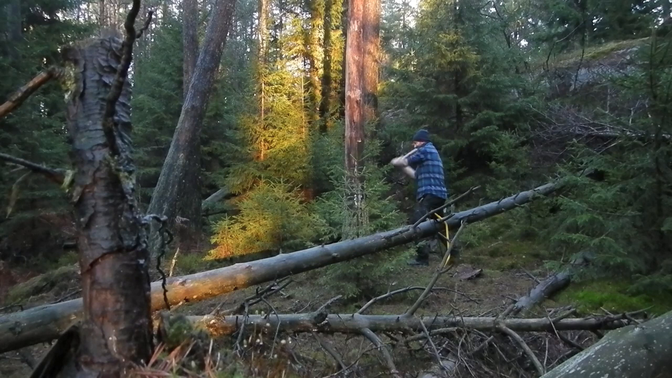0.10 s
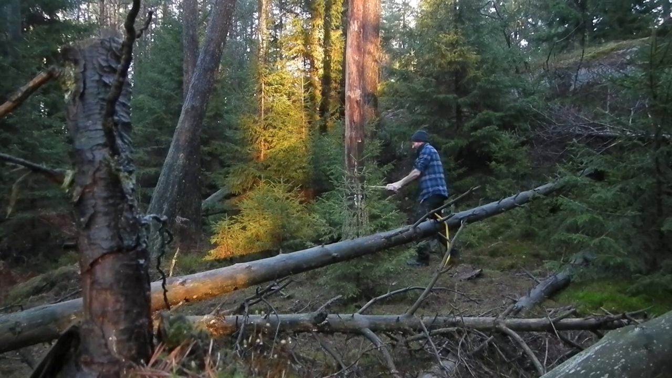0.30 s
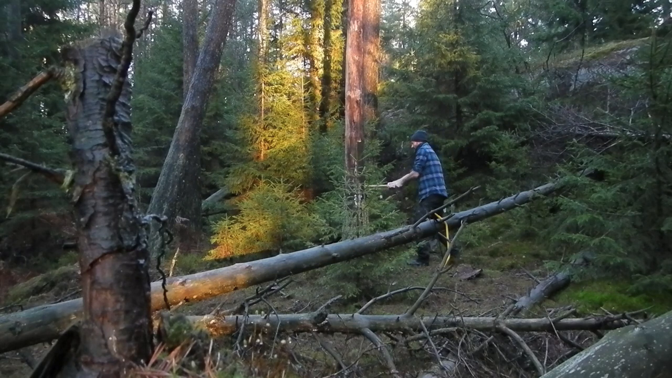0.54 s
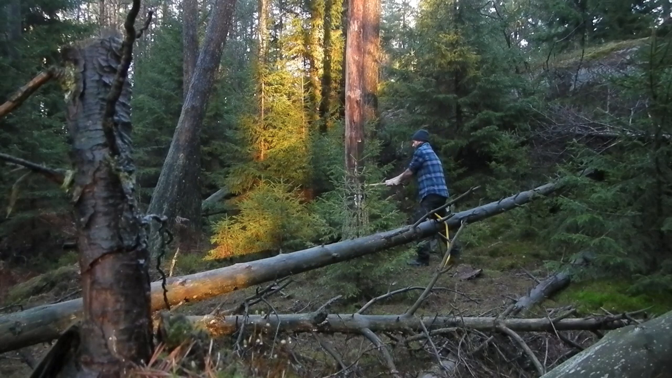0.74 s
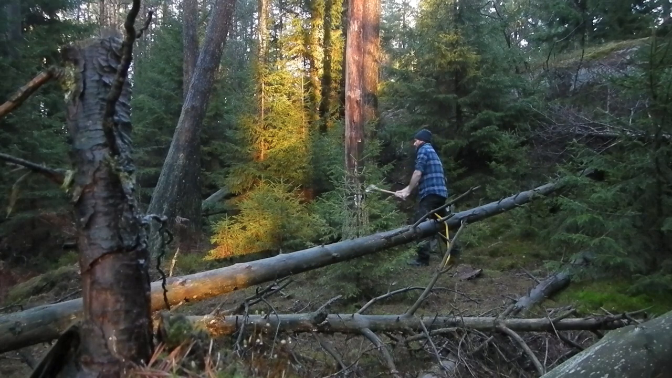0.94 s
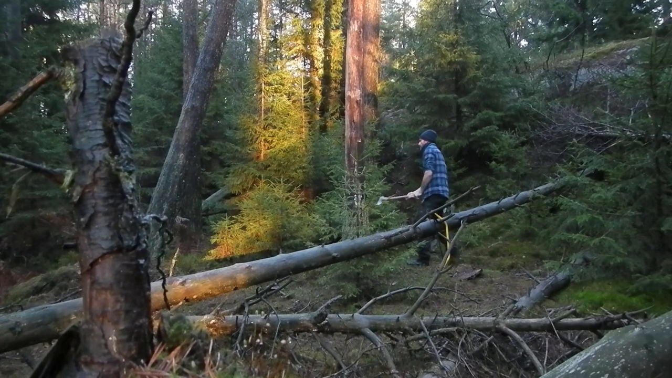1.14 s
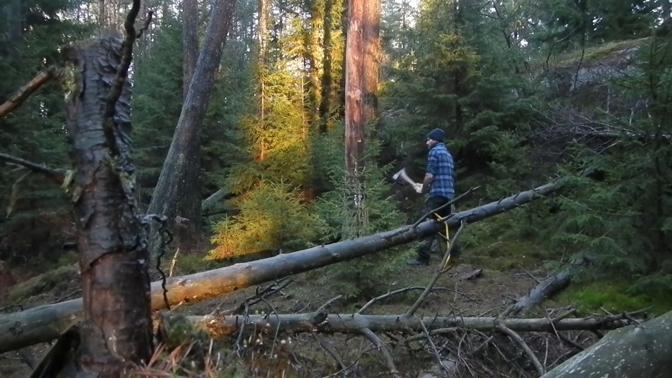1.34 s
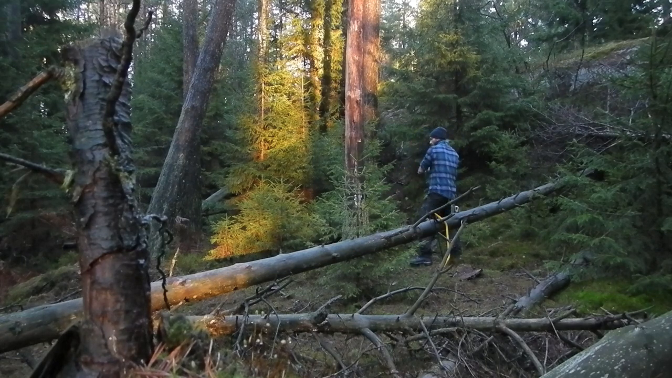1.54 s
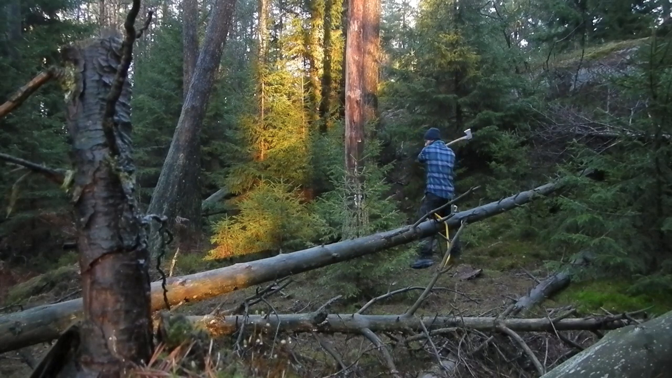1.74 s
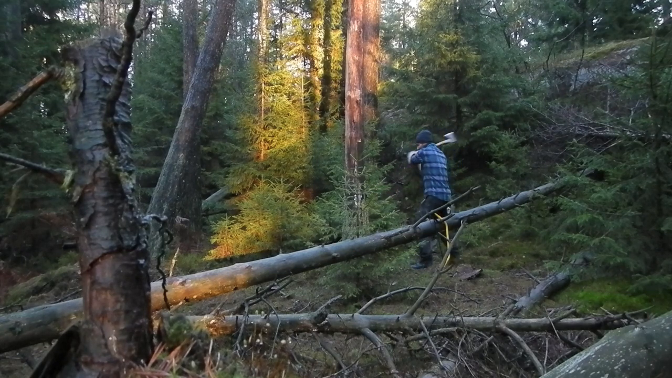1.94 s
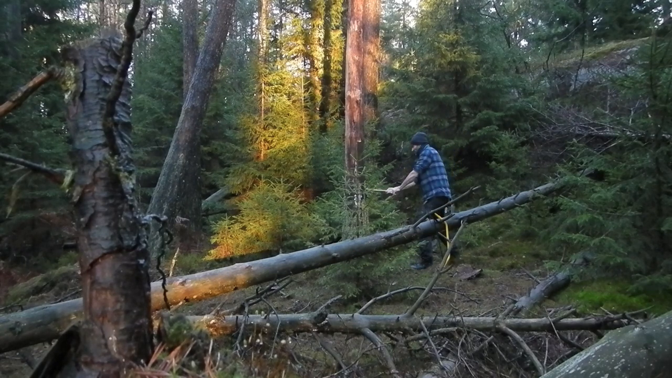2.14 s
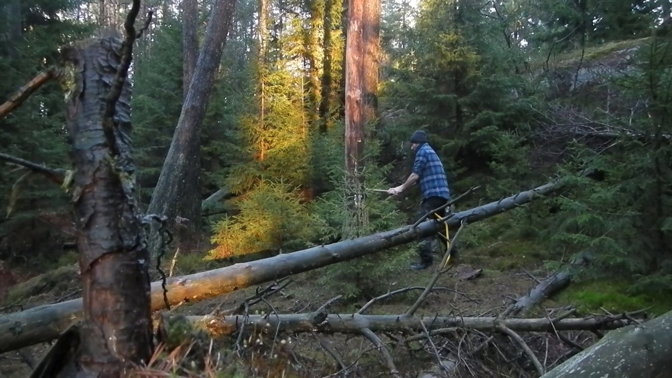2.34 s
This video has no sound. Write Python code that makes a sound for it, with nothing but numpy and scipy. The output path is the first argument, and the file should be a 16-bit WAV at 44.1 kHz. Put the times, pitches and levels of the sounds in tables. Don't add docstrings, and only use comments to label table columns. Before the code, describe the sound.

Two hard axe chops into dry wood, nearly two seconds apart, with short woodland echoes and steady hiss

```python
import sys
import numpy as np
from scipy import signal
from scipy.fft import rfft, irfft, next_fast_len
from scipy.io import wavfile
from scipy.ndimage import map_coordinates

SR = 44100
rng = np.random.default_rng(int(sys.argv[2]) if len(sys.argv) > 2 else 0)


def boost(x):
    u = np.asarray(x, float) / 20
    return 10 ** u


def generate_wav(signal):
    frames = np.transpose(np.atleast_2d(signal))
    scaled = np.clip(frames, -1, 1) * 32767
    pcm = np.round(scaled).astype(np.int16)
    wavfile.write(sys.argv[1], SR, pcm)


N = 110250


def unit(x):
    return x / np.sqrt(np.mean(x ** 2) + 1e-20)


def along(points, hz):
    point_hz, value = np.transpose(points)
    return np.interp(np.log(hz + 1), np.log(point_hz + 1), value)


def coloured(x, points):
    size = next_fast_len(x.shape[-1] + 8192)
    gain = boost(along(points, np.fft.rfftfreq(size, 1 / SR)))
    return irfft(rfft(x, size) * gain, size)[..., :x.shape[-1]]


def wobble(rate):
    knots = rng.standard_normal(int(N * rate / SR) + 4)
    return map_coordinates(knots, [np.arange(N) * rate / SR])


def add(track, x, start_s):
    part = track[..., max(round(start_s * SR), 0):][..., :x.shape[-1]]
    part += x[..., :part.shape[-1]]


def pan(db):
    return boost([[db], [-db]])


def stereo(mid, side):
    return np.array([mid + side, mid - side])


def burst(points, t60):
    t = np.arange(SR // 10) / SR
    noise = unit(coloured(rng.standard_normal(len(t)), points))
    rise = np.sin(np.pi / 2 * np.clip(t / 0.00037, 0, 1)) ** 2
    return noise * boost(-60 * t / t60) * rise


def puff(points, db, t60, side_db):
    t = np.arange(SR // 2) / SR
    noise = unit(coloured(rng.standard_normal((2, len(t))), points))
    level_db = np.array([[db], [db + side_db]])
    fade_db = 60 * (t / t60) ** 1.42
    mid, side = noise * boost(level_db - fade_db) * (1 - np.exp(-t / 0.0043))
    return stereo(mid, side)


# delay in seconds, level in dB.
FIBRE_SPLITS = [
    [(.0008, -20), (.0018, 1), (.0030, -1), (.0040, 0.5), (.0052, -24.5)],
    [(.0006, 4), (.0016, 4.5), (.0028, -4), (.0038, 5.5), (.0050, 5)],
]
# frequency in Hz, level in dB.
CRACK_COLOUR = [(300, -42), (800, -10), (3000, 4), (6000, -16), (10000, -10), (14500, -20), (15800, -60)]
# frequency in Hz, level in dB, 60 dB decay in seconds,
# start delay in seconds.
FIRST_CUT_TONES = [(160, -30.5, 0.026, 0.0012), (580, -6.5, 0.032, 0.00211), (810, -7, 0.0087, 0.00321),
                   (969, -2.5, 0.099, 0.002113), (1197, -4, 0.019, 0.00375), (1570, -7.5, 0.023, 0.00358),
                   (1870, -3, 0.021, 0.00131), (2620, -5, 0.02, 0.00102), (3103, -4.5, 0.024, 0.000942),
                   (3536, -8, 0.013, 0.000994), (5730, -14.5, 0.0055, 0.000945)]
SECOND_CUT_TONES = [(163, -26, 0.037, 0.002), (610, -10.5, 0.029, 0.00273), (805, -28, 0.02, 0.0029),
                    (948, -10, 0.081, 0.003), (1220, -8.5, 0.028, 0.00123), (1487, -6.5, 0.027, 0.002075),
                    (1943, -10, 0.021, 0.002), (2210, -11, 0.014, 0.00113), (2587, -3.5, 0.015, 0.00101),
                    (2946, -13, 0.011, 0.00104), (3050, -10, 0.013, 0.0012),
                    (3666, -15.5, 0.0081, 0.000974), (4120, -13.5, 0.01, 0.000904),
                    (5110, -12, 0.0098, .0006)]
# frequency in Hz, level in dB.
CUT_DIPS = [
    [(1100, 0.5), (1250, -6), (1400, 1.5), (2050, -1.5), (2300, 2), (2500, -0.5)],
    [(1500, -0.5), (1700, -14), (1850, -1.5), (2050, 0), (2250, 0)],
]
# frequency in Hz, level in dB.
GROUND_BOUNCE = [(30, -26), (80, -4), (150, 12), (270, -13), (560, 2), (720, -2), (850, -0.5)]


def chop(k):
    tones = (FIRST_CUT_TONES, SECOND_CUT_TONES)[k]
    lodge_s = (0.0062, 0.0058)[k]
    rock_s, ring_lodge_db = (0.012, 0.0155)[k], (2, 6)[k]
    wood, ring = np.zeros(SR // 5), np.zeros(SR // 5)
    t = np.arange(SR // 10) / SR
    for i, (hz, level_db, t60, delay_s) in enumerate(tones):
        swell = 1 - np.exp(-t * hz / 0.9)
        tone = boost(level_db - 4 - 60 * t / t60) * np.sin(2 * np.pi * hz * t) * swell
        add(ring if i == 3 else wood, tone, delay_s)
    for delay_s, db in FIBRE_SPLITS[k]:
        dulling = [(4530, 0), (7400, -1000 * delay_s)]
        crack = coloured(burst(CRACK_COLOUR, 0.0044), dulling)
        add(wood, boost(db - 14) * crack, delay_s)

    def after(start_s):
        return np.clip((np.arange(len(wood)) / SR - start_s) / 0.00036, 0, 1)

    wood = wood * boost(-5.5 * after(lodge_s))
    ring = ring * boost(-ring_lodge_db * after(lodge_s) - 16 * after(rock_s))
    return coloured(coloured(wood + ring, GROUND_BOUNCE), CUT_DIPS[k])


# frequency in Hz, level in dB.
THUD_COLOURS = [
    [(25, -14), (60, -15), (110, -7.5), (200, -6.5), (330, -14.5), (700, -26), (1500, -86)],
    [(25, -24), (60, -6), (110, -1.5), (200, 0.5), (330, -5), (700, -29), (1500, -39)],
]


def ground_thud(k):
    return puff(THUD_COLOURS[k], -26.5, (0.25, 0.27)[k], side_db=-16.5)


# frequency in Hz, level in dB.
SPLINTER_COLOUR = [(1500, -20), (3000, -7), (5000, 3.5), (7000, -14.5), (10000, 4.5), (12500, -3.5),
                   (13600, -5)]
# frequency in Hz, level in dB.
TREBLE_END = [(13800, -60), (14600, -110)]


def splinters(k):
    return puff(SPLINTER_COLOUR + TREBLE_END[1:], (-34.5, -36)[k], (0.3, 0.25)[k], side_db=1.5)


# delay in seconds, level in dB.
TRUNK_ECHOES = [
    [(.023, -33), (.029, -34), (.051, -27), (.064, -29), (.081, -24), (.092, -27), (.110, -38), (.122, -42),
     (.178, -30), (.222, -33), (.237, -28), (.252, -31), (.283, -28), (.299, -33), (.314, -31), (.329, -32),
     (.362, -42)],
    [(.019, -20), (.026, -18), (.049, -21), (.059, -19), (.071, -29), (.081, -20.5), (.091, -28),
     (.103, -20), (.116, -28), (.150, -36), (.178, -33), (.190, -32), (.215, -32), (.275, -32.5),
     (.325, -35)],
]
# frequency in Hz, level in dB.
TRUNK_COLOURS = [
    [(300, -20), (600, -17), (800, 0), (970, -6.5), (1200, -10), (2500, -8), (6000, -23)],
    [(300, -20), (700, -10), (950, 8), (1200, -2), (1470, 4.5), (1750, -4), (2600, -8), (6000, -28)],
]


def single_trunks(hit, k):
    echoes = TRUNK_ECHOES[k]
    taps = np.zeros((2, SR // 2))
    for (delay_s, db), side in zip(echoes, rng.standard_normal(len(echoes))):
        lean_db = 1.3 * side * np.array([1, -1])
        taps[:, round(delay_s * SR)] = boost(db + lean_db) * np.sign(side)
    bark_t60 = 0.028
    smear = signal.lfilter([1], [1, -boost(-60 / (bark_t60 * SR))], np.abs(taps))
    taps = taps + boost(-26) * rng.standard_normal(taps.shape) * smear
    return signal.fftconvolve(coloured(hit, TRUNK_COLOURS[k] + TREBLE_END)[None], taps, axes=1)


def trees(x, decay, tone, build_s):
    hz, t, noise = signal.stft(rng.standard_normal((2, SR)), SR, nperseg=256)
    level_db = along(tone, hz)[:, None] - 60 * t / along(decay, hz)[:, None]
    tail = signal.istft(noise * boost(level_db), SR, nperseg=256)[1]
    length = tail.shape[1]
    build = np.clip(np.arange(length) / SR / build_s, 0, 1) ** 2
    tail = tail * build * boost(2 * wobble(69)[:length])
    echo = signal.fftconvolve(x[None], tail / np.linalg.norm(tail[0]), axes=1)
    mid, side = echo * boost([[0], [-13.5]])
    return stereo(mid, side)


# frequency in Hz, 60 dB decay in seconds.
NEAR_DECAY = [(100, 0.32), (400, 0.34), (1000, 0.098), (2500, 0.18), (6000, 0.038), (14000, 0.25)]
# frequency in Hz, level in dB.
NEAR_COLOURS = [
    [(150, 6), (350, 10), (550, -4), (1000, -7.5), (1900, 0.5), (3000, -12), (5000, -11), (13500, -6)],
    [(150, -1), (350, -9), (550, -6.5), (1000, 4), (1400, 0), (3000, -8), (5000, -15), (13500, -13)],
]


def near_trees(hit, k):
    return boost(-6) * trees(hit, NEAR_DECAY, NEAR_COLOURS[k] + TREBLE_END[1:], build_s=0.0014)


# frequency in Hz, 60 dB decay in seconds.
FAR_DECAY = [(100, 0.3), (500, 1.33), (1000, 1.43), (1600, 1.2), (4000, 0.82), (14000, 0.6)]
# frequency in Hz, level in dB.
FAR_COLOURS = [
    [(300, -14), (550, -3.5), (800, -2), (970, 13), (1150, 0.5), (1900, 0), (3000, -5.5), (7000, -16.5), ],
    [(300, -21), (600, -8), (950, 0), (1150, -4), (1480, -1.5), (1750, -10), (2600, -8), (7000, -19.5)],
]


def deep_forest(k):
    tail = trees(np.ones(1), FAR_DECAY, [(1, 0)], build_s=0.0053)
    return boost((12, 14)[k]) * coloured(tail, FAR_COLOURS[k] + TREBLE_END)


# start in seconds, peak level in dB, gain duck in dB.
AXE_BLOWS = [
    (0.22, -2, -12.5),
    (2.099, -2, -7),
]


def axe():
    out = np.zeros((2, N))
    tail_pan = pan(1.45)
    for k, (start_s, db, _) in enumerate(AXE_BLOWS):
        hit = boost(db + 5) * chop(k)
        add(out, pan(1.05) * hit, start_s)
        add(out, tail_pan * ground_thud(k), start_s)
        add(out, splinters(k), start_s)
        add(out, tail_pan * single_trunks(hit, k), start_s)
        add(out, tail_pan * near_trees(hit, k), start_s)
        add(out, tail_pan * deep_forest(k), start_s)
    return out


def swish():
    start_s, end_s = 2.035, 2.1
    progress = (np.arange(N) / SR - start_s) / (end_s - start_s)
    hz = np.interp(progress, (0, 1), (380, 720))
    strength = np.clip(progress, 0, 1) * (progress < 1) * (1 + 0.5 * wobble(120))
    phase = 2 * np.pi * np.cumsum(hz) / SR + 0.9 * wobble(90)
    return boost(-48.5) * strength * np.sin(phase)


# start in seconds, level in dB.
CHIP_FALLS = [
    (0.467, -37),
    (.520, -32.5),
    (.775, -44),
    (.96, -45.5),
    (1.196, -40.5),
    (2.455, -45),
]
# frequency in Hz, level in dB.
CHIP_COLOUR = [(1500, -30), (3500, 7), (6000, -3.5), (9000, -5), (13000, 3), (14300, -70)]


def chips():
    out = np.zeros((2, N))
    for start_s, db in CHIP_FALLS:
        tick = np.array([burst(CHIP_COLOUR, 0.0062), burst(CHIP_COLOUR, 0.012)])
        add(out, boost(db) * tick, start_s)
    return out


def layer(mid_points, side_points, levels_db, flutter_db, rate):
    mid_db, side_db = levels_db
    mid = boost(mid_db) * unit(coloured(rng.standard_normal(N), mid_points))
    side = boost(side_db) * unit(coloured(rng.standard_normal(N), side_points))
    return stereo(mid, side) * boost(flutter_db * wobble(rate))


# frequency in Hz, level in dB.
RUMBLE_MID = [(12, -21), (20, -8), (76, -2), (250, -5), (468, -9), (641, -10.5), (850, -24), (1100, -42),
              (1870, -120)]
RUMBLE_WIDE = [(12, -32.5), (20, -6), (161, -3), (376, -6), (440, -6.5), (850, -10), (1100, -37.5),
               (1870, -120)]
HOUSING_MID = [(470, -30.5), (800, -17.5), (992, -7.5), (1310, -10.5), (1680, -21), (1830, -6.5),
               (2180, -1.5), (2490, -4.5), (2900, -26), (3770, -40), (6380, -120)]
HOUSING_WIDE = [(470, -36), (800, -24), (910, -1.5), (1050, 1.5), (1600, -5), (1840, -1), (2190, 0.5),
                (2900, -10), (3770, -47), (6380, -120)]
HISS_MID = [(1680, -12.5), (2850, -1.5), (4090, 2), (5610, -7.5), (6480, -5), (7150, -1), (9740, -12),
            (11800, -10), (13700, -18)]
HISS_WIDE = [(1680, -34.5), (2850, -16), (3470, -10), (4310, -4.5), (5690, -17), (6930, -10), (8440, -19),
             (12100, -22.5), (13000, -19.5)]
# frequency in Hz, level in dB.
HISS_END = [(14100, -53), (14600, -80)]


def mechanism():
    rumble = layer(RUMBLE_MID, RUMBLE_WIDE, (-58.5, -60), flutter_db=1.2, rate=7.13)
    housing = layer(HOUSING_MID, HOUSING_WIDE, (-48, -56), flutter_db=0.19, rate=26.2)
    hiss = layer(HISS_MID + HISS_END, HISS_WIDE + HISS_END, (-56, -57), flutter_db=0.25, rate=3.5)
    whine_hz = 14836
    whine = boost(-56.5) * pan(-0.7) * np.sin(2 * np.pi * whine_hz * np.arange(N) / SR)
    return rumble + housing + hiss + whine


def scene():
    return axe() + swish() + chips() + mechanism()


# start in seconds, end in seconds, low edge in Hz,
# high edge in Hz.
TREBLE_GAPS = [
    (.2100, .2175, 2900, 13500),
    (2.0875, 2.0955, 2900, 17000),
]


def treble_gaps(x):
    t = np.arange(N) / SR
    for start_s, end_s, low_hz, high_hz in TREBLE_GAPS:
        edges = [(low_hz - 400, -90), (low_hz, 0), (high_hz, 0), (high_hz + 400, -90)]
        inside = np.clip(np.minimum(t - start_s, end_s - t) / 0.001 + 0.5, 0, 1)
        x = x - coloured(x, edges) * (1 - boost(-40)) * inside
    return x


def gain_control():
    wait_s, drop_s, hold_s, recover_db_per_s = 0.0049, 0.0034, 0.18, 19.5
    t, gain_db = np.arange(N) / SR, np.zeros(N)
    for start_s, _, duck_db in AXE_BLOWS:
        since = t - start_s - wait_s
        climb_db = recover_db_per_s * np.clip(since - hold_s, 0, None)
        drop = 1 - np.exp(-np.clip(since, 0, None) / drop_s)
        gain_db = gain_db + np.minimum(duck_db + climb_db, 0) * drop
    return gain_db


def roll_off(x):
    return signal.sosfilt(signal.butter(12, 16480, fs=SR, output="sos"), x)


def record(dry):
    gain_db = gain_control()
    treble = coloured(dry, [(6000, -50), (9000, 0), (13600, 0), (14200, -50)])
    ducked = dry - treble * (1 - boost(0.43 * gain_db))
    x = treble_gaps(ducked * boost(gain_db))
    ceiling = 0.84
    x = x / (1 + np.abs(x / ceiling) ** 6) ** (1 / 6)
    x = signal.sosfilt(signal.butter(16, 15900, fs=SR, output="sos"), x)
    return roll_off(x)


dry = scene()
out = record(dry)
generate_wav(out)
```